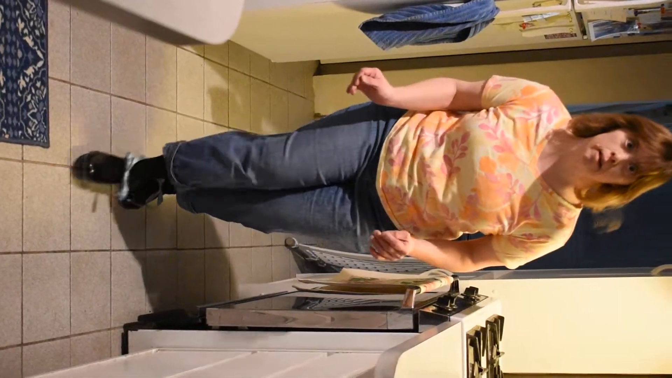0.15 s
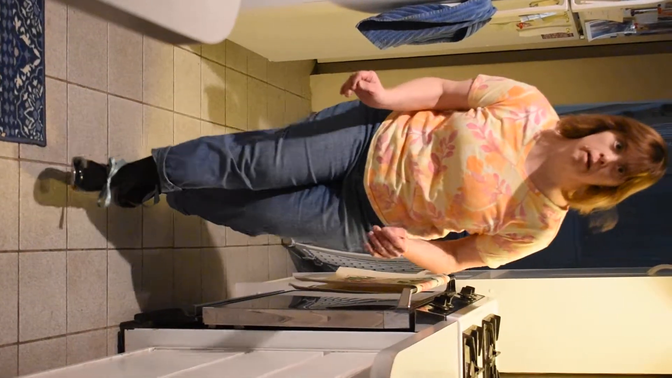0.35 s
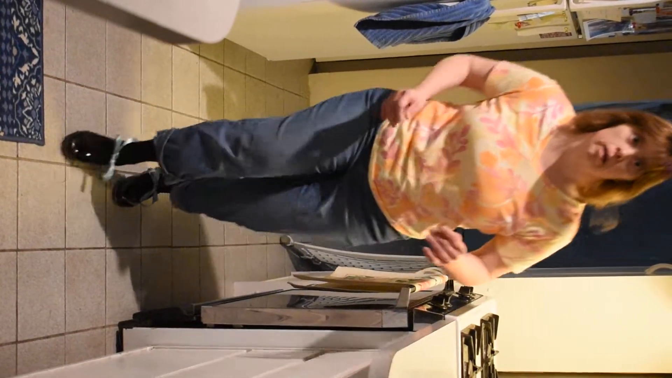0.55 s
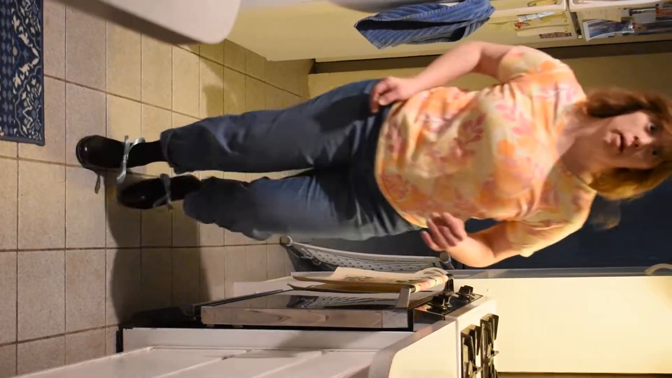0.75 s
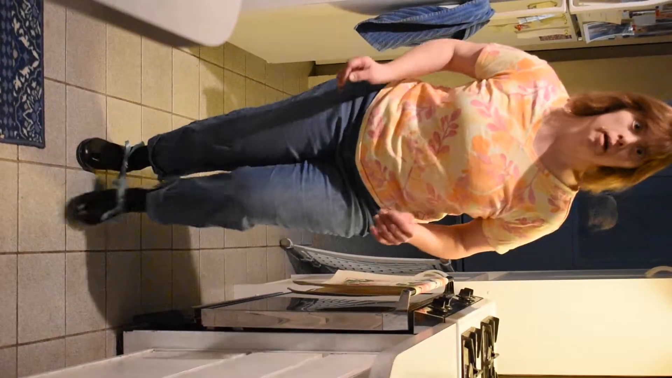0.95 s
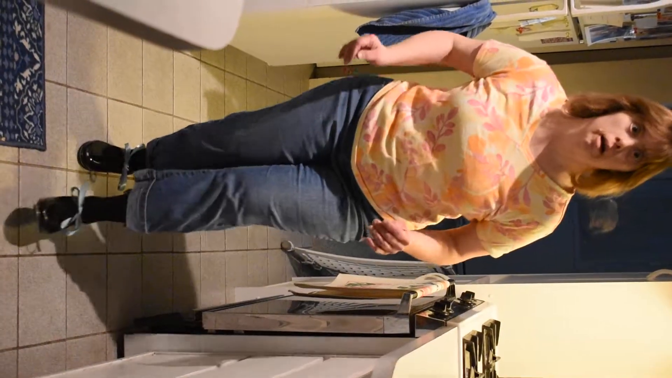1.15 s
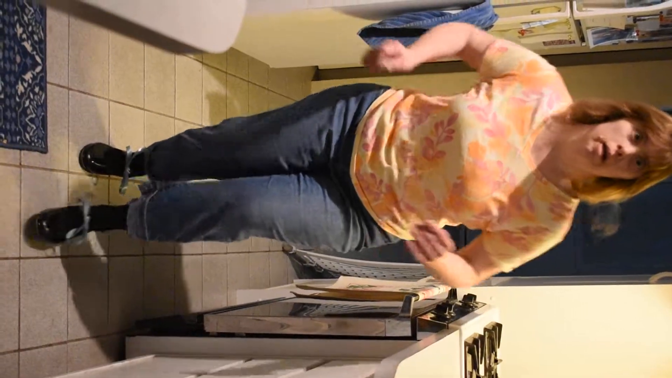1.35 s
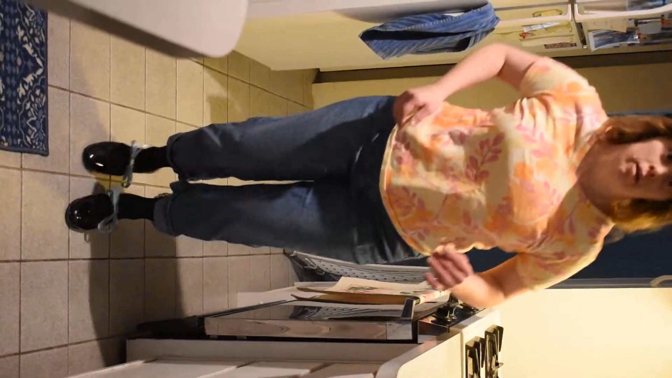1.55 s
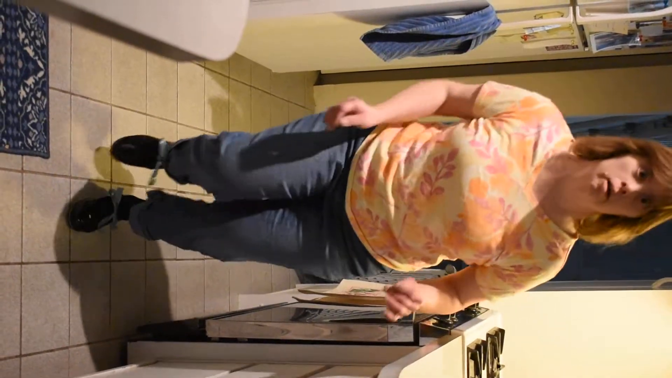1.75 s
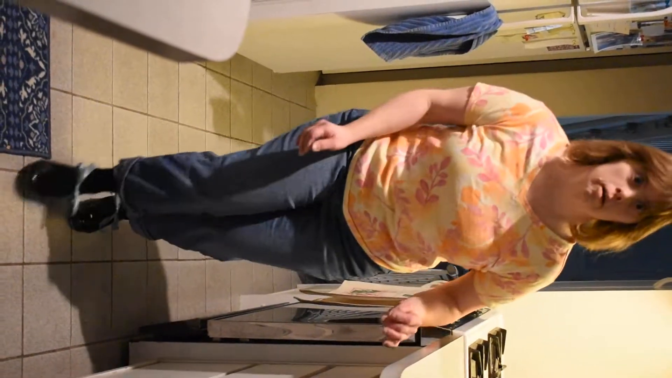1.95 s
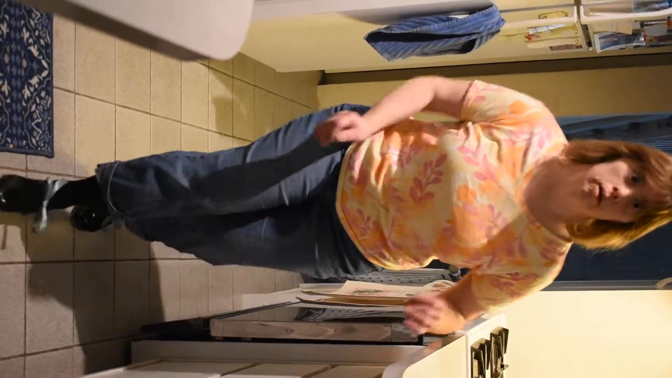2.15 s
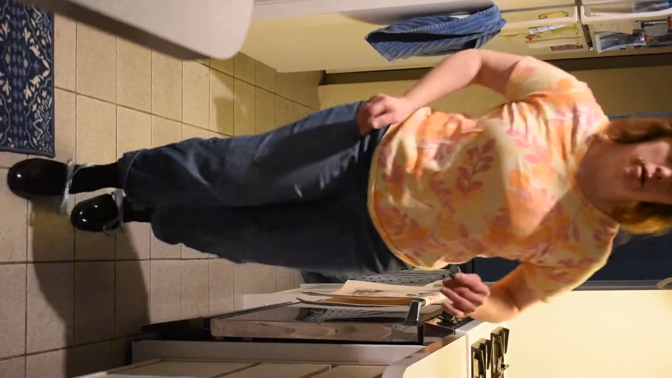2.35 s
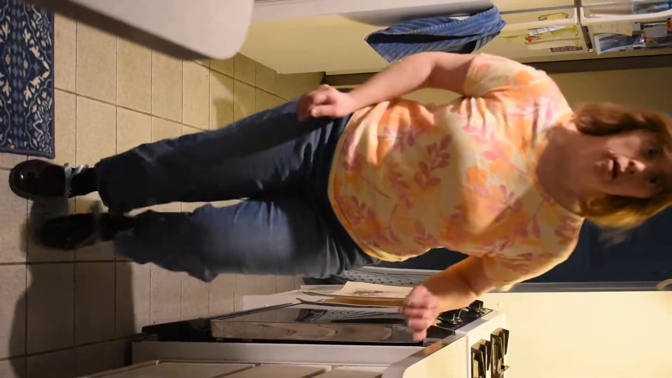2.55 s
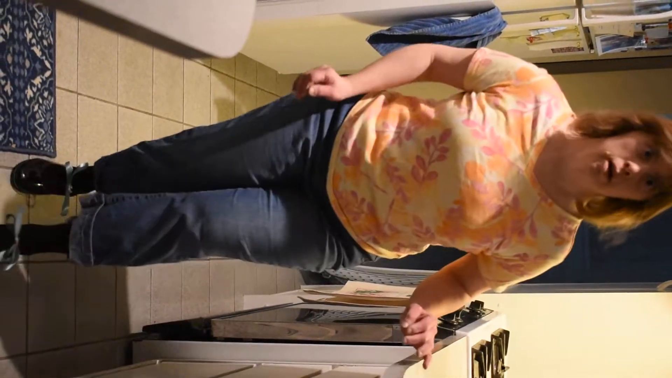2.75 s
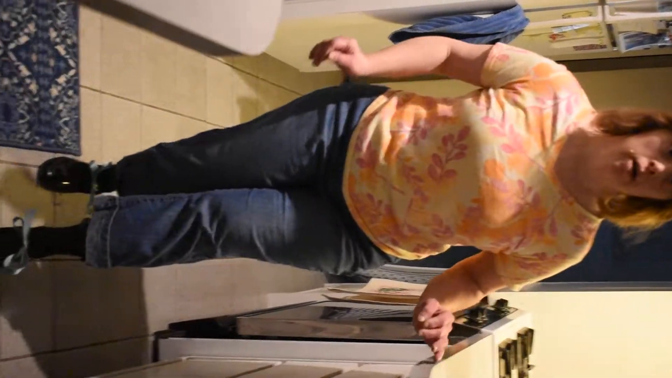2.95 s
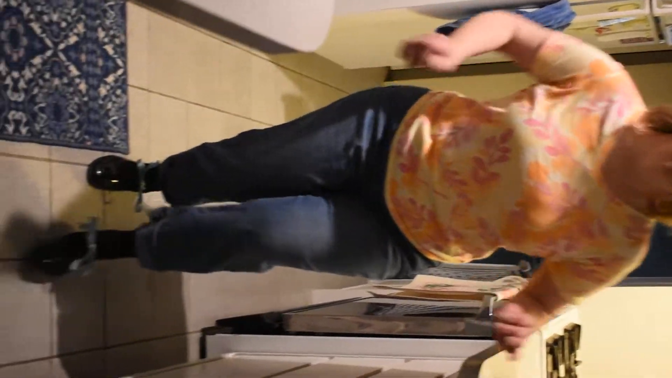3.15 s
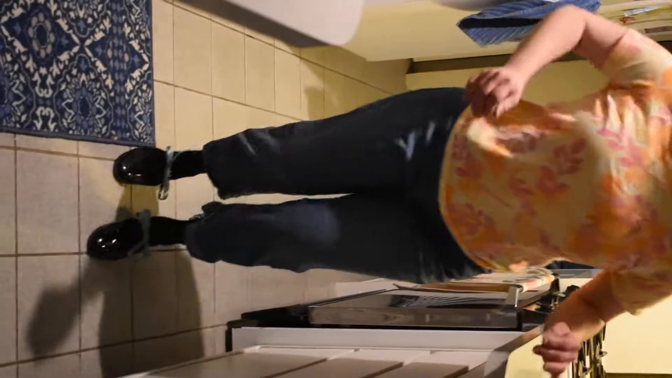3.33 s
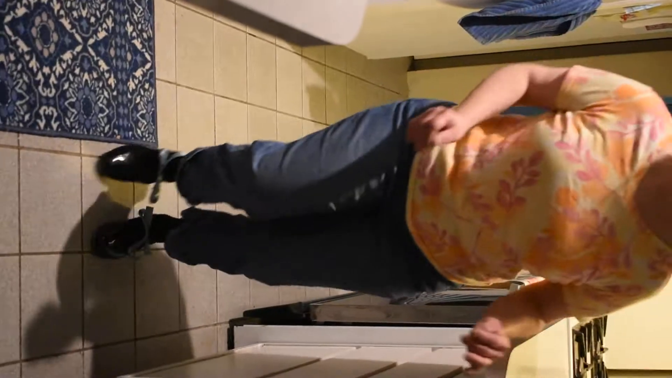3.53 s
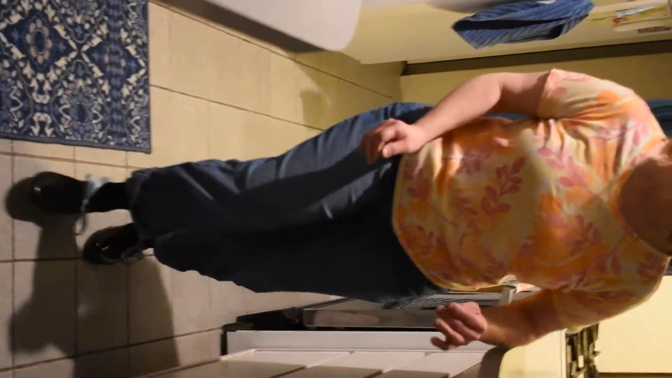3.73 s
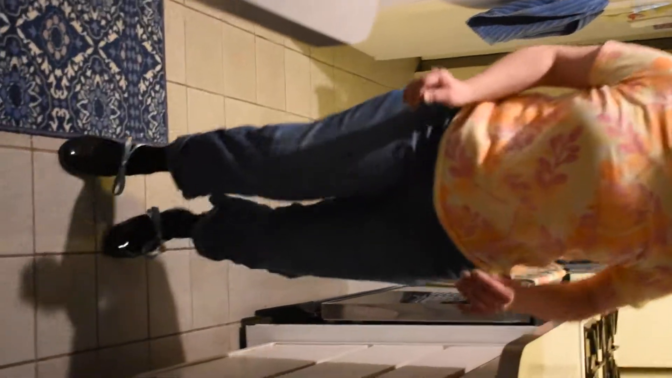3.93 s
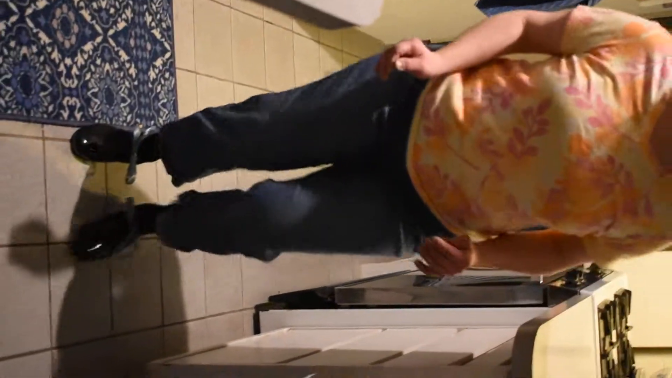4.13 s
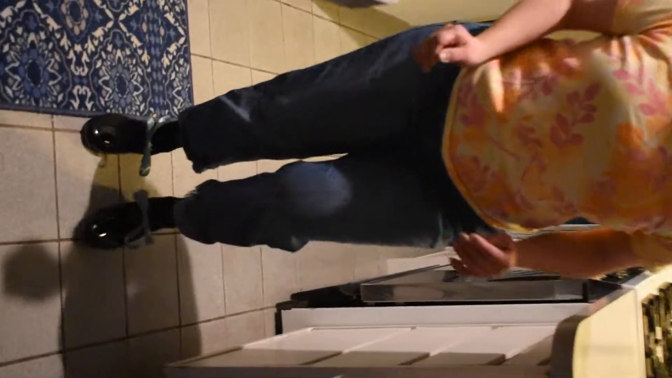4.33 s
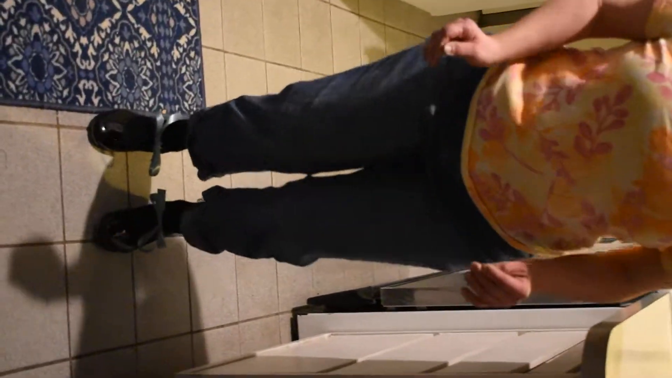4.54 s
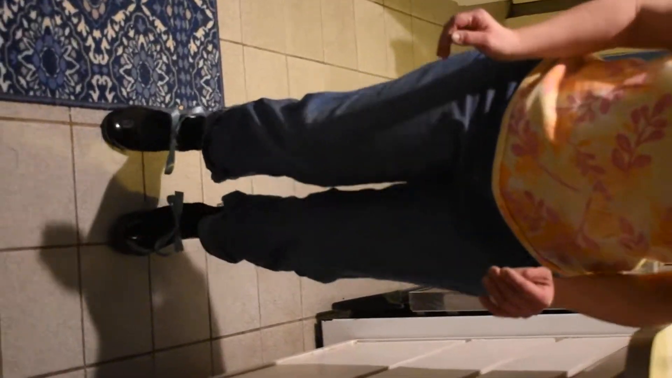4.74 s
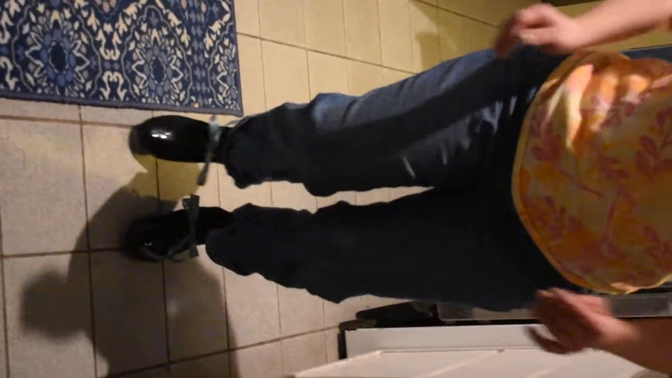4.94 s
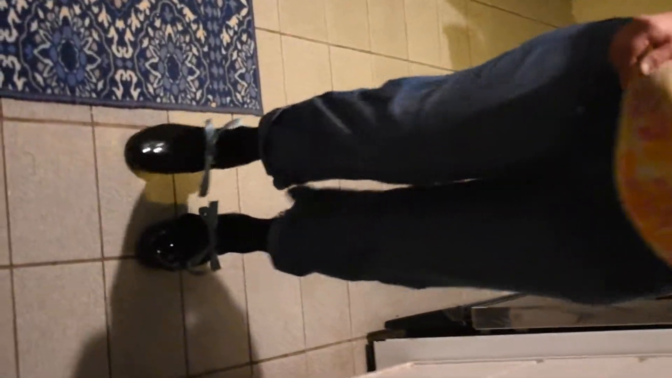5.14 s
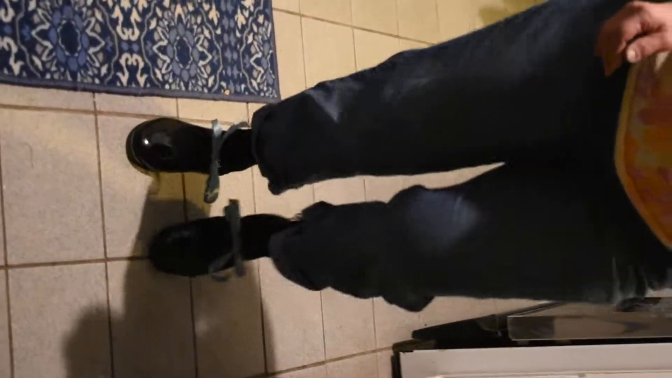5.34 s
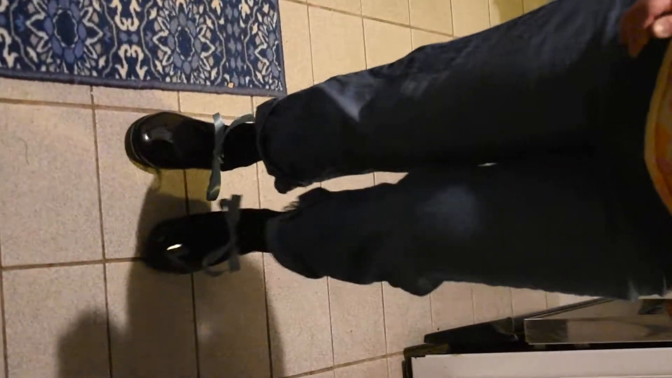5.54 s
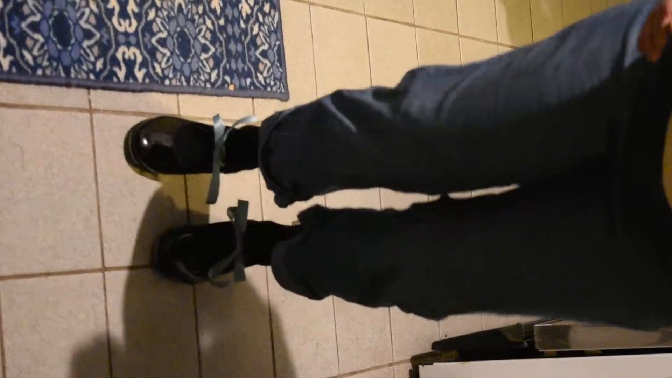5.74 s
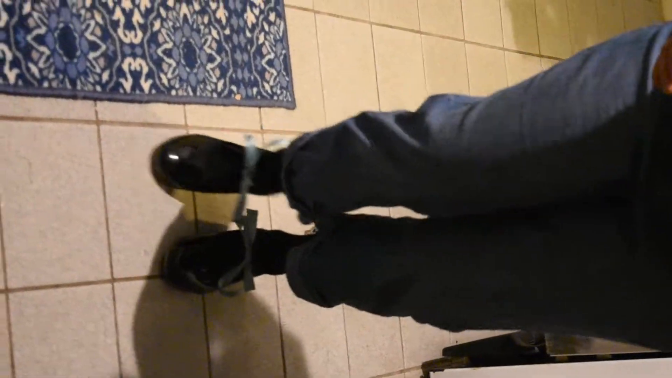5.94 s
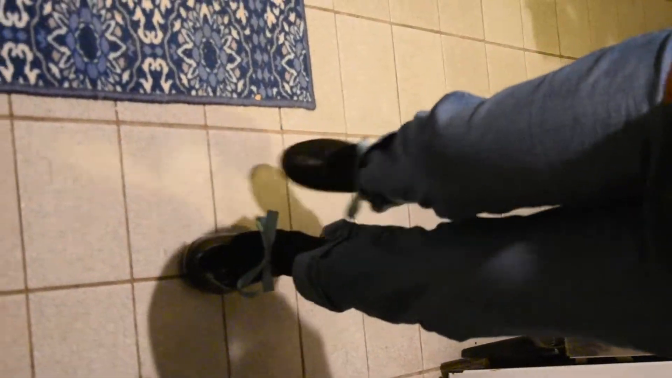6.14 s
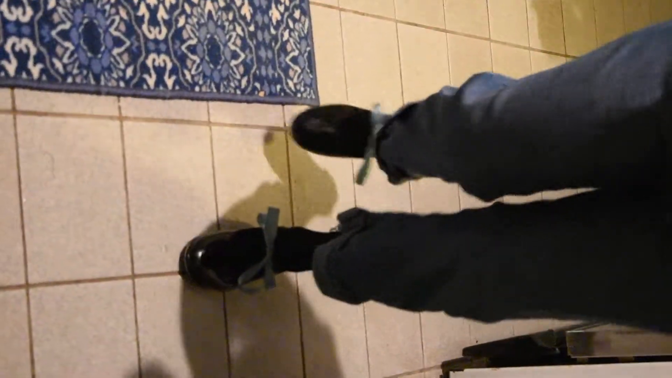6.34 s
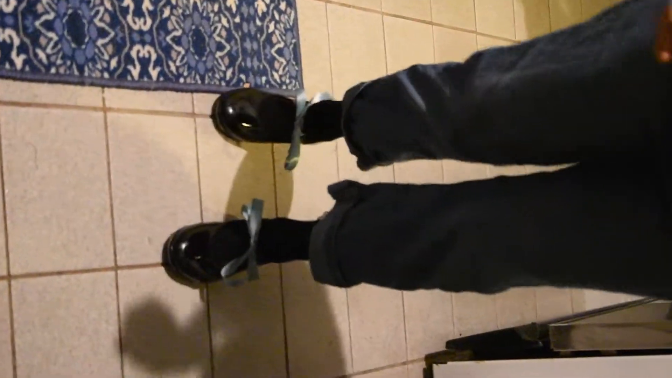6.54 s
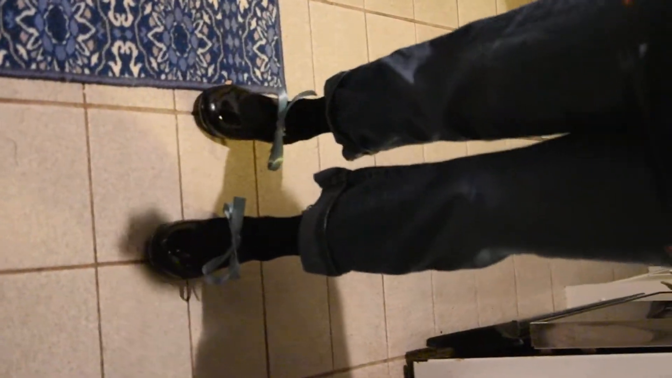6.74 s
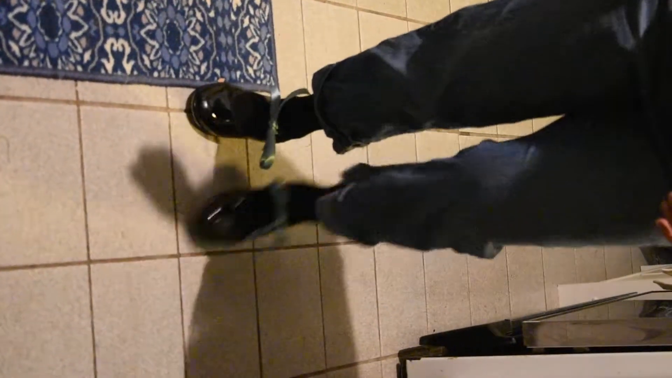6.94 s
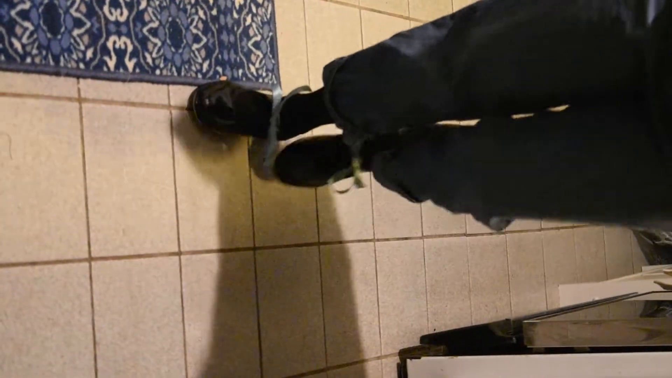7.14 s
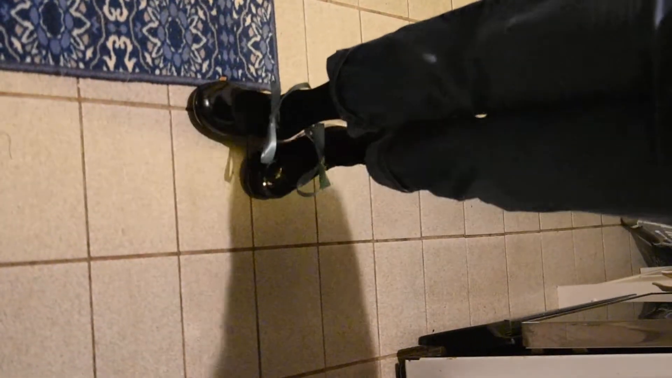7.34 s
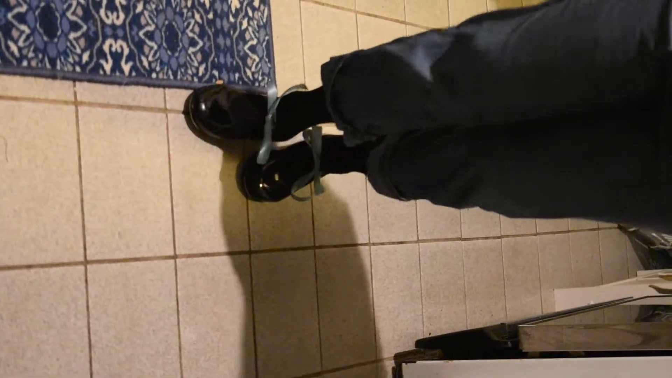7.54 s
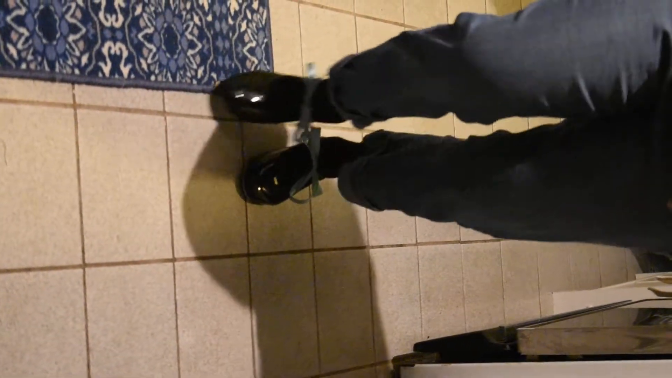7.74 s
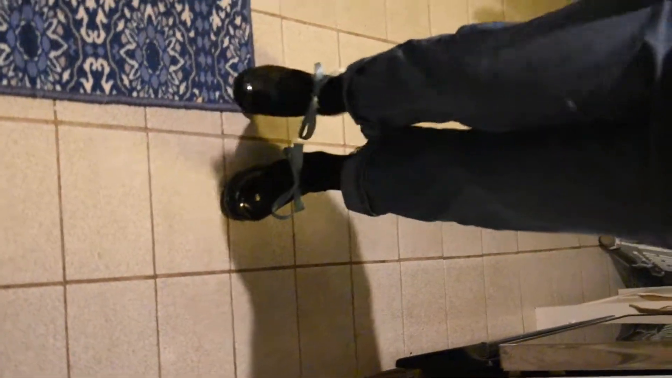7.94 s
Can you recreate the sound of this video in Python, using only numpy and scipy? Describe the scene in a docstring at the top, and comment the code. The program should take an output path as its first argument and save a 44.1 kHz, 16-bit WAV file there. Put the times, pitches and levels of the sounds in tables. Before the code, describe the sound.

Slow, irregular tap steps on tile, metallic clicks and hollow knocks with brief scuffs, ringing in a small kitchen over faint low hum-like hiss.

```python
"""A small kitchen with a hard tiled floor, where a dancer practises slow tap steps.
Strikes are single blows and drags are trains of tiny blows; both ring a resonant shoe, then the room.
The room answers with random echoes coloured by standing waves, over soft steady noise.
A decaying low tone booms in the floor once; a few dry knocks and high ticks, decaying tones, sound close by."""
import sys
import numpy as np
from scipy import signal
from scipy.fft import rfft, irfft
from scipy.io import wavfile

SR = 44100
rng = np.random.default_rng(int(sys.argv[2]) if len(sys.argv) > 2 else 0)


def waveform_to_disk(signal):
    """Save audio, clipped to [-1, 1], as 16-bit WAV at the path in sys.argv[1]."""
    frames = np.transpose(np.atleast_2d(signal))
    scaled = np.clip(frames, -1, 1) * 32767
    samples = np.round(scaled).astype(np.int16)
    wavfile.write(sys.argv[1], SR, samples)


N = 356328  # length in samples

# Strikes of the shoe on tile:
# start_s, strength_db, heel_weight_db, sole_hollowness_db, contact_hardness_db, knock_hz, ring_hz
TAPS = [(0.056, 6, -3, -8, -9, 700, 5000), (0.0617, 12, -7, -3.5, 1.5, 735, 5450),
        (0.104, 11, -1.5, -9, -2, 620, 5070), (0.4547, 14.5, -4.5, 15, -18, 920, 4440),
        (0.491, 11.5, -5, 28.5, 4, 1040, 4400), (0.648, 8.5, 1.5, 2, 3.5, 760, 3530),
        (0.847, 1, -3, -5.5, -14.5, 815, 4090), (1.0238, 19, -10.5, 9, 0.5, 826, 4380),
        (1.088, 5, -16, 36.0, 3.5, 860, 4100), (1.308, -1.5, 19, 26, 17.0, 1080, 3500),
        (1.531, 9, 0.5, 2.5, 3, 626, 2900), (1.69, 6.0, 1, -2, -9, 910, 3700),
        (1.974, 12, 1, 7.5, 2, 1030, 5340), (2.043, 9.5, 0.0, 17, -4, 1040, 5300),
        (2.366, 3, 2, -8, 2, 820, 4100), (2.373, 11.5, 8.5, 7, 5.5, 720, 4580),
        (2.53, 11.5, -1.0, -8.0, -12.5, 870, 4370), (3.0862, 12, 10, 29, 9.5, 960, 2900),
        (3.3207, 11.5, 14.5, 17.5, 8.5, 1220, 6230), (3.9247, 7.5, 5.5, -2.5, -2, 800, 3120),
        (4.4094, 14.5, 13.5, 11.5, 14.5, 900, 3780), (4.524, -9.5, 2, 10, -17, 870, 4100),
        (5.1753, 6, 5.5, -0.5, 7.5, 920, 5300), (5.3517, 5, 0.5, -11.5, -14, 820, 4160),
        (5.576, 8, 16, 10.5, 10, 890, 6600), (5.668, -3.5, 0.0, -0.5, -16.0, 790, 3700),
        (6.4578, 10, 11, 6, 6.5, 1120, 4960), (6.662, -12.5, 11, 2, -20, 780, 4060),
        (6.686, -9, 7, -7, -21, 790, 4100), (7.222, 6, 16.5, 17, 14.5, 1250, 6000),
        (7.232, 2, 3, 3.5, 2, 740, 5370), (7.591, -14.5, 11.5, 4, -6, 830, 4100),
        (7.648, -12.5, -5.5, -4.5, -5, 770, 2900), (7.673, -6, -8, -4, -13, 810, 2820)]
# Drags of the plate across tile; the swell is the pressure gained from start to end:
# start_s, end_s, swell_db, strength_db, heel_weight_db, sole_hollowness_db, contact_hardness_db,
# knock_hz, ring_hz
SCRAPES = [(0.064,0.121,4,13,-1,-7,-5,620,5040), (0.109,0.145,12,15,-17,3.5,1.5,730,5100),
           (0.148,0.191,0,14.5,-5,15.5,-21,937,4970), (0.461,0.486,-9,17,-4.5,-1,-23,780,4300),
           (0.73,0.77,-6,-1,0,-4.5,-5.5,770,3480), (1.03,1.083,-3.5,21,0,13,3.5,874,3830),
           (1.461,1.475,0,-19.5,-18,-37,-7,780,4020), (1.563,1.633,-6,7,0,-1,3,750,4100),
           (1.982,2.034,-5,16.5,-3,16,5.5,920,5350), (2.046,2.132,-10.5,19,-3,13.5,-1.5,873,4950),
           (2.224,2.24,-4,-16,-2,-5,3,820,5040), (3.097,3.128,-1.5,14,15,23.5,9,880,2860),
           (3.477,3.507,11,0.5,8,2.5,-4,816,3200), (3.698,3.843,-1.5,-16,-1,-5,-4,740,4400),
           (4.057,4.093,18,8,10.5,10,-1.5,960,3800), (4.09,4.155,-11.5,15,2,0,1.5,980,3730),
           (4.139,4.22,11.5,14.5,2,0,-1,990,3580), (5.234,5.343,-22,-2,4.5,1.5,2.5,635,4000),
           (5.364,5.4,-4,5,2,8.5,4,1190,5560), (5.405,5.44,-1,7.5,-2.5,-3,-0.5,740,5970),
           (6.689,6.715,7,-9,6.5,4,-18,780,4100), (6.833,6.885,6,-18.5,-6,-26,6,820,4650),
           (7.923,8.064,6,-13,5,-7,-6,704,3750)]
# Close dry knocks, levels ahead of the high-pass: start_s, thump_db, click_db, click_hz
NUDGES = [(5.9313, -26.5, -23.5, 1700), (5.942, -45, -25, 2080), (6.1111, -20.5, -26, 1190)]
# Faint high ticks close to the microphone, levels ahead of the high-pass: start_s, level_db
TICKS = [(6.223, -50), (6.2568, -45), (6.268, -43), (6.2927, -50)]
# Standing waves of the kitchen and the gaps between them: centre_hz, width_hz, gain_db
STANDING = [(132, 25, -2.5), (196.3, 23, 7.5), (241, 29, 5), (340.3, 18.4, 8), (412, 38, 4.5),
            (500, 195, -3), (558, 11, 3), (617, 40, 0), (743, 19, -9), (853, 37, 0.5), (989, 76, 3),
            (1124, 51, -2.5), (1364, 12, 7), (1530, 31, 5.5), (1923, 12, 0), (2167, 8.7, 1)]
# Colour common to both shoes, relative: frequency_hz, colour_db
SHOE = [(40, -27.5), (90, -30), (130, -4), (200, -5), (400, -0.5), (7500, -0.5), (9800, -3), (13000, -1),
        (16000, -10)]
# How long the room takes to die away by 60 dB: frequency_hz, decay_s
DECAY = [(150, 0.32), (400, 0.31), (1040, 0.27), (2760, 0.27), (7280, 0.23), (14000, 0.16)]
# Straight sound against the room's: frequency_hz, gain_db
DIRECT = [(200, -16.5), (1000, -11), (4000, -20.5), (8000, -3.5), (15000, -30)]
# Stereo width curve, side against mid ahead of each layer's own offset: frequency_hz, side_db
WIDTH = [(40, -15), (150, -33.5), (400, -20.5), (1300, -20), (2600, -12), (5000, -10.5), (9000, -5.5),
         (14000, -0.5)]
# Colour of the steady noise, relative density per Hz: frequency_hz, density_db
BACKGROUND = [(25, -9), (48, -2), (70, -13), (95, -6.5), (125, 6), (165, -5.5), (250, 2.5), (370, 0),
              (550, -5.5), (1000, -5.5), (1500, -6), (2500, -13), (4500, -19), (9000, -32), (15000, -46)]
# Level of the steady noise over time: time_s, level_db
BACKGROUND_DB = [(0, -53), (1.9, -51.5), (2.9, -52), (4.8, -49), (6.0, -52), (6.3, -53.5), (7.1, -54),
                 (8.05, -52)]
# Shoe outline in a plain step, relative, one value per resonance:
# heel thud_db, sole knock_db, plate clack_db, plate ring_db, plate ping_db, edge tick_db
PLAIN_STEP_DB = [-1, 2, -0.4, -8.5, -19.5, -32.5]

# Where the shoe meets the tile sets knock and ring; thud and clack are multiples of the knock's pitch
THUD_RATIO, CLACK_RATIO = 0.38, 2.39
PING_HZ, TICK_HZ = 7390, 13500  # the top two resonances stay put
BOOM_S = 2.531  # when the floor booms
EDGE_HZ = 16000  # upper band limit
SPAN = 24576  # length in samples of one contact's ringing
HZ = np.fft.rfftfreq(SPAN, 1 / SR)
T = np.arange(SPAN) / SR
MID_TO_SIDE = np.array([[1], [-1]])  # the side signal's sign in left and right


def amp(db):
    """Decibels to gain."""
    return 10 ** (np.asarray(db) / 20)


def read(points, hz):
    """A spectrum joined by straight lines over log frequency."""
    f, value = np.transpose(points)
    return np.interp(np.log(hz + 1), np.log(f), value)


def unit(x):
    """Scales to an energy of one."""
    return x / np.sqrt(np.sum(x ** 2, -1, keepdims=True) + 1e-20)


def peak(hz, width):
    """The bell of a resonance, of height one."""
    return 1 / (1 + (2 * (HZ - hz) / width) ** 2)


def causal(db):
    """The minimum-phase filter with this gain, which rings only after the blow."""
    both_sides_db = np.r_[db, db[-2:0:-1]]
    log_gain = np.log(amp(both_sides_db))
    return np.exp(np.conj(signal.hilbert(log_gain)))[:len(HZ)]


def add(mix, s, sound):
    """Mixes a sound in at a time in seconds."""
    part = mix[..., max(round(s * SR), 0):][..., :sound.shape[-1]]
    part += sound[..., :part.shape[-1]]


def ringing(spectrum):
    """A contact's sound in time, faded out from 70 to 80 percent of its span."""
    return irfft(spectrum) * np.clip(8 - 10 * T / T[-1], 0, 1)


def background(side_db=8.0):
    """The soft steady noise of the kitchen: coloured random noise, widened by the stereo curve."""
    hz = np.fft.rfftfreq(N, 1 / SR)
    mid, side = rfft(rng.standard_normal((2, N))) * amp(read(BACKGROUND, hz))
    width = amp(read(WIDTH, hz) + side_db)
    pair = irfft(mid + MID_TO_SIDE * side * width, N)
    level_db = np.interp(np.arange(N) / SR, *np.transpose(BACKGROUND_DB))
    return unit(pair) * np.sqrt(N) * amp(level_db)


def kitchen(build_s=0.00032, hold_s=0.017, echoes_per_s=3000, crowd_s=0.009, side_db=-3.0, count=11):
    """Returns a function that gives the left and right response from a fresh spot on the floor."""
    edges = np.r_[0, np.geomspace(230, 11000, count), SR]
    bands = (HZ >= edges[:-1, None]) & (HZ < edges[1:, None])
    band_centre_hz = (bands * HZ).sum(1) / bands.sum(1)
    t60 = read(DECAY, band_centre_hz)[:, None]
    # reflections off the cupboards build up, hold briefly, then die away
    build = np.minimum(T / build_s, 1)
    decay = amp(-60 * np.maximum(T - hold_s, 0) / t60)
    fade = (build * decay).astype(np.float32)
    # the first ones come sparsely; the crowd thickens with the square of time until every sample has one
    density = np.minimum(echoes_per_s * (1 + (T / crowd_s) ** 2) / SR, 1)
    share = np.sqrt(bands.mean(1))[:, None]
    standing = causal(sum(db * peak(hz, width) for hz, width, db in STANDING))
    direct = causal(read(DIRECT, HZ))
    width = amp(read(WIDTH, HZ) + side_db)

    def spot():
        """The straight sound and one random pattern of echoes."""
        arrivals = (rng.random(SPAN) < density) / np.sqrt(density)
        echoes = rfft((arrivals * rng.standard_normal((2, 1, SPAN))).astype(np.float32))
        band_tails = unit(irfft(echoes * bands) * fade) * share
        mid, side = rfft(band_tails.sum(1)) * standing
        return direct + mid + MID_TO_SIDE * width * side
    return spot


def shoe(strength_db, weight_db, hollow_db, hard_db, knock_hz, ring_hz, breadth=0.34,
         sharp_db=2.5, sharp_per_light=0.18, clack_share=0.24, ring_share=0.24):
    """How plate and sole ring: six broad resonances, each as strong as the contact excites it."""
    pitches = np.sort([THUD_RATIO * knock_hz, knock_hz, CLACK_RATIO * knock_hz,
                       ring_hz, PING_HZ, TICK_HZ])
    # weight feeds the thud, a hollow sole the knock and some clack, a hard contact the top three
    fed_db = [weight_db, hollow_db, clack_share * hollow_db, ring_share * hard_db, hard_db, hard_db]
    outline_db = read(list(zip(pitches, np.add(PLAIN_STEP_DB, fed_db))), HZ)
    bells = sum(peak(hz, breadth * hz) for hz in pitches)
    # a light touch damps the plate less, so its resonances stand out more
    sharpness_db = sharp_db + sharp_per_light * max(-strength_db, 0)
    colour_db = read(SHOE, HZ) + outline_db + sharpness_db * (bells - 1)
    # level the colour's mean power, so that strength alone sets the shoe's loudness
    mean_db = 10 * np.log10(np.mean(amp(colour_db) ** 2))
    return causal(strength_db + colour_db - mean_db)


def taps(spot, lag_s=0.00085, plate_hz=3000):
    """Each strike is one sharp blow that rings the shoe and the room."""
    # the sole lands first; the loose plate snaps against it a moment later, so highs lag lows
    delay = lag_s * HZ ** 2 / (HZ ** 2 + plate_hz ** 2)
    blow = np.exp(-2j * np.pi * np.cumsum(delay) * HZ[1])
    out = np.zeros((2, N))
    for s, *contact in TAPS:
        add(out, s, ringing(blow * shoe(*contact) * spot()))
    return out


def scrapes(spot, skips_per_s=300, grit=0.29, spread_db=7.0, edge=0.051):
    """A dragged plate skips over the tile in tiny uneven blows, with fine grit between them."""
    out = np.zeros((2, N))
    for start, end, swell_db, *contact in SCRAPES:
        n = int(np.clip((end - start) * SR, 200, SPAN / 2))
        hits = rng.random(SPAN) < skips_per_s / SR
        skips = hits * amp(spread_db * rng.standard_normal(SPAN))
        friction = unit(skips[:n]) + grit * unit(rng.standard_normal(SPAN)[:n])
        pressure = signal.windows.tukey(n, edge) * amp(np.linspace(0, swell_db, n))
        drag = rfft(unit(friction * pressure), SPAN)
        add(out, start, ringing(drag * shoe(*contact) * spot()))
    return out


def boom(level_db=-39.0, hz=45, t60=0.32):
    """A heel drop flexes the floor itself: one low sine that dies away by 60 dB in t60 seconds."""
    out = np.zeros(N)
    add(out, BOOM_S, amp(level_db - 60 * T / t60) * np.sin(2 * np.pi * hz * T))
    return out


def nudges(thump_hz=285, thump_s=0.0023, click_s=0.00058, tick_hz=8200, low_hz=130):
    """Dry, quickly damped knocks and ticks close to the microphone, with no room and the lows cut."""
    def damped(level_db, hz, decay_s):
        """A sine that fades exponentially."""
        return amp(level_db) * np.sin(2 * np.pi * hz * T) * np.exp(-T / decay_s)

    out = np.zeros(N)
    for s, thump_db, click_db, click_hz in NUDGES:
        add(out, s, damped(thump_db, thump_hz, thump_s))
        add(out, s, damped(click_db, click_hz, click_s))
    for s, tick_db in TICKS:
        add(out, s, damped(tick_db, tick_hz, click_s))
    low_cut = signal.butter(4, low_hz, "highpass", fs=SR, output="sos")
    return signal.sosfilt(low_cut, out)


def scene():
    """Steady noise, both shoes in the kitchen, the floor's boom and the close knocks and ticks."""
    spot = kitchen()
    return background() + taps(spot) + scrapes(spot) + boom() + nudges()


def record(dry, ceiling=1.0):
    """The loudest peaks are rounded off; then the highs are cut at the band limit."""
    limited = dry / (1 + (dry / ceiling) ** 4) ** (1 / 4)
    band_limit = signal.firwin(511, EDGE_HZ, window=("kaiser", 9), fs=SR)
    return signal.oaconvolve(limited, band_limit[None], "same")


dry = scene()
out = record(dry)
waveform_to_disk(out)
```